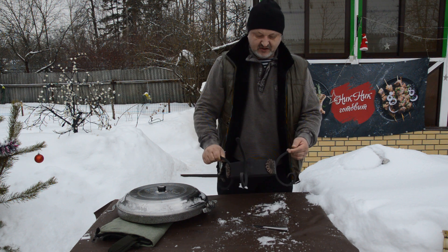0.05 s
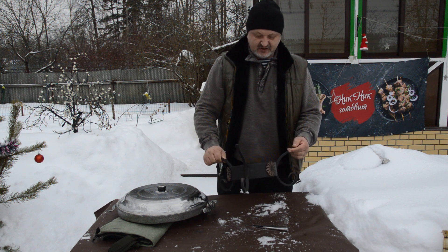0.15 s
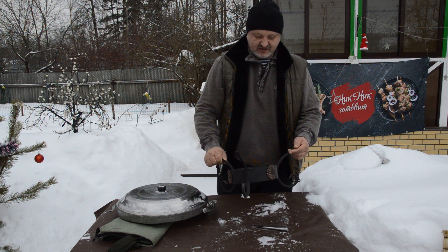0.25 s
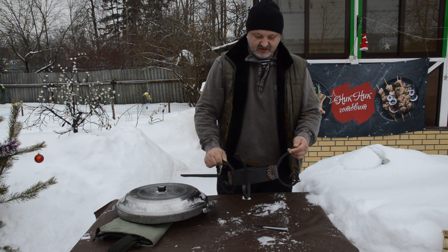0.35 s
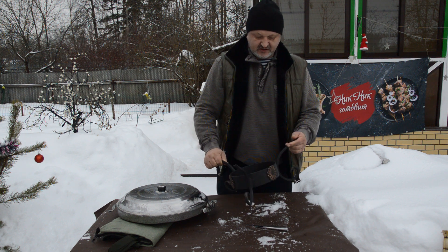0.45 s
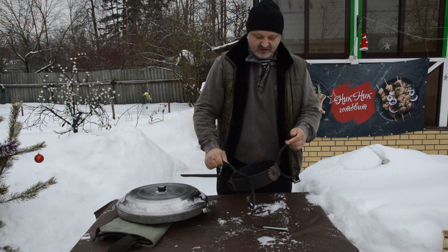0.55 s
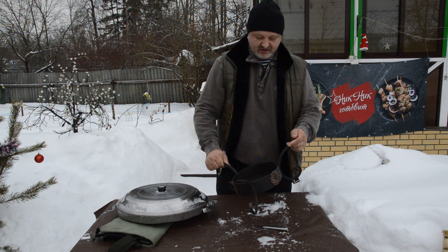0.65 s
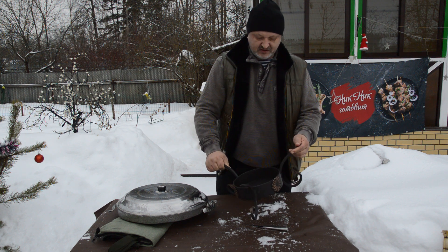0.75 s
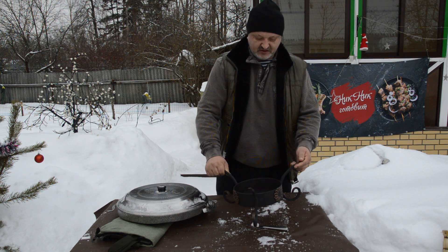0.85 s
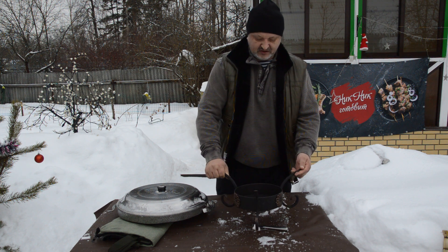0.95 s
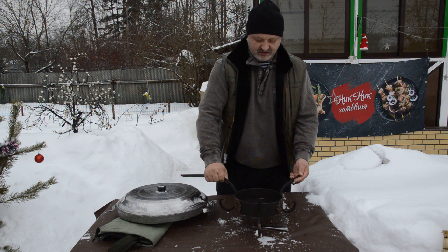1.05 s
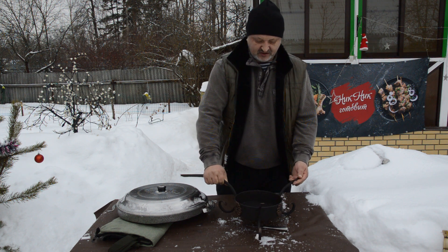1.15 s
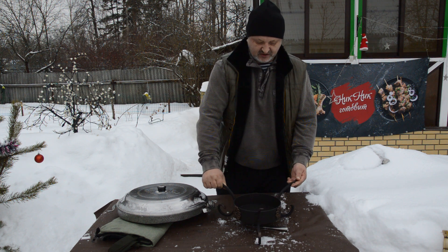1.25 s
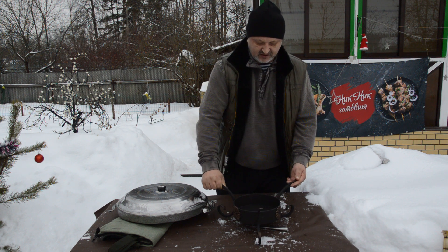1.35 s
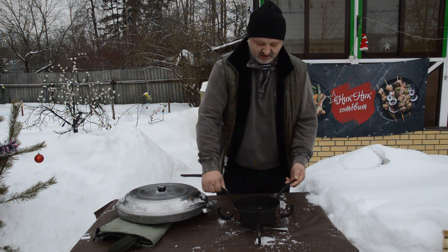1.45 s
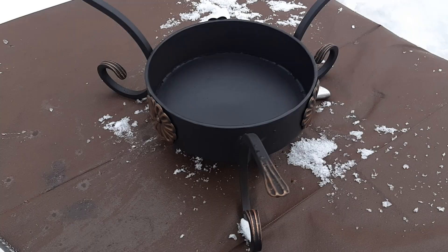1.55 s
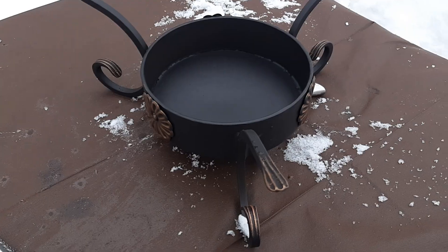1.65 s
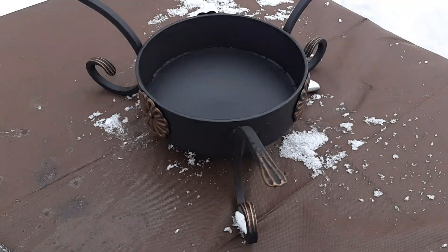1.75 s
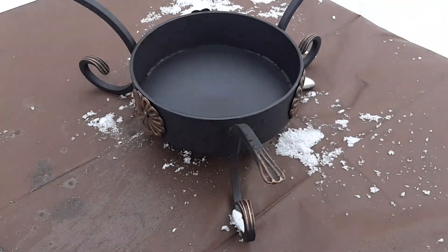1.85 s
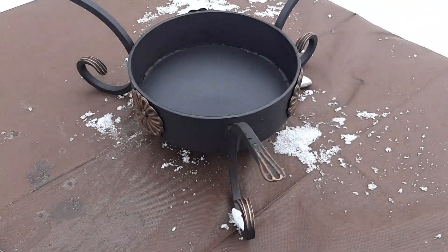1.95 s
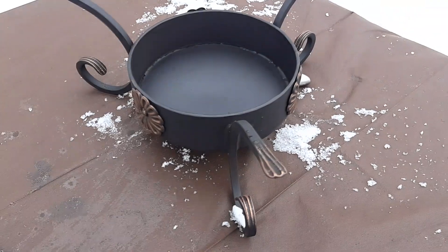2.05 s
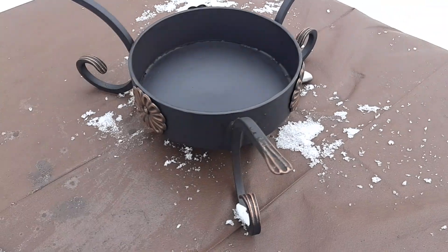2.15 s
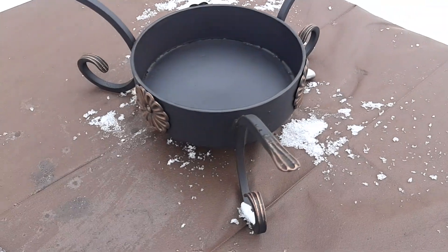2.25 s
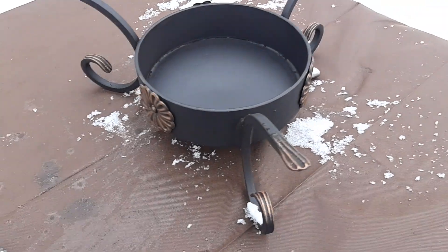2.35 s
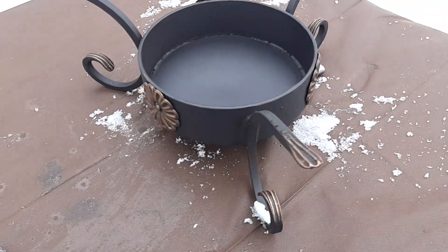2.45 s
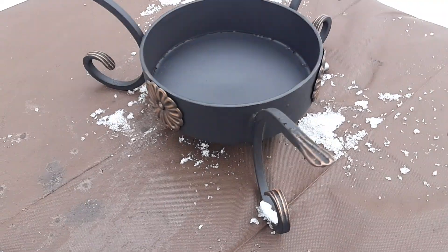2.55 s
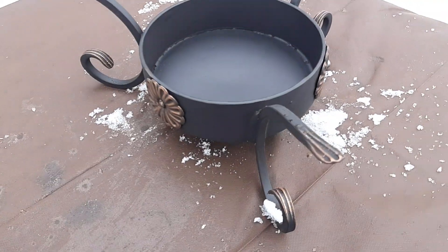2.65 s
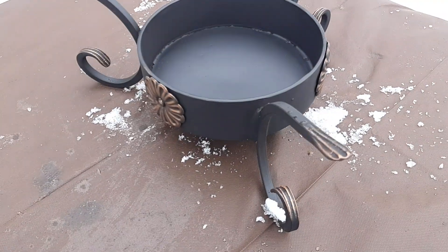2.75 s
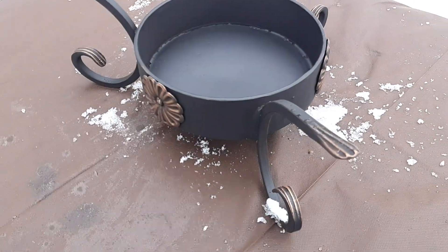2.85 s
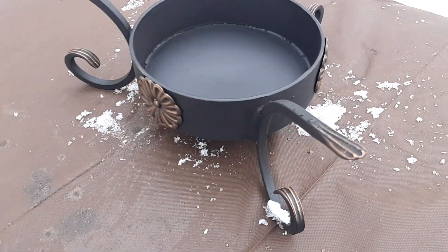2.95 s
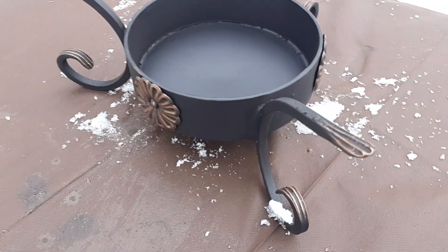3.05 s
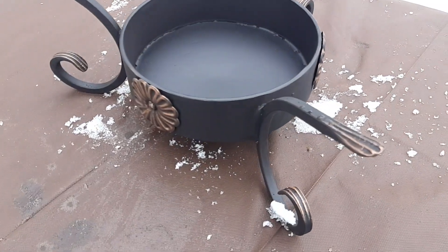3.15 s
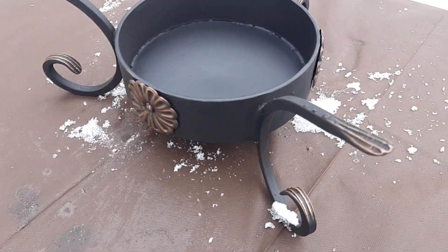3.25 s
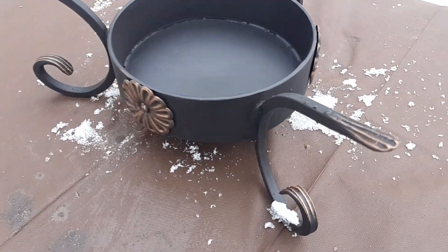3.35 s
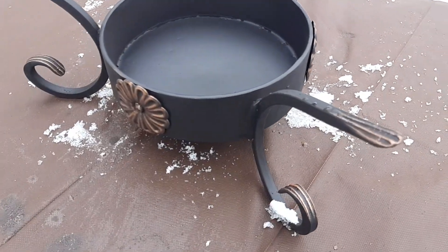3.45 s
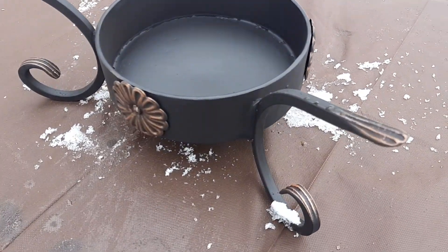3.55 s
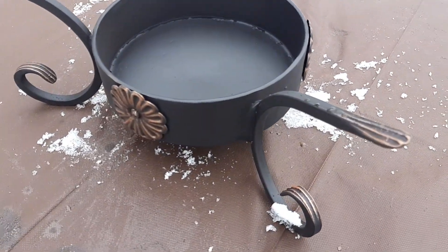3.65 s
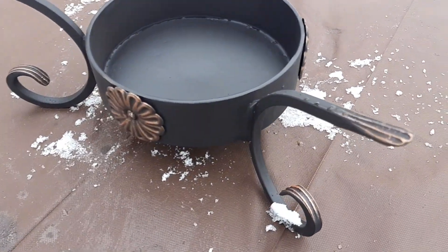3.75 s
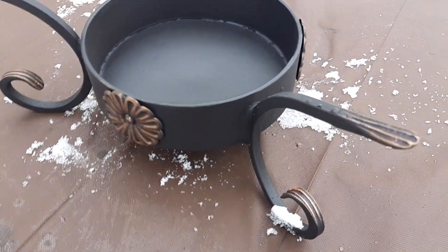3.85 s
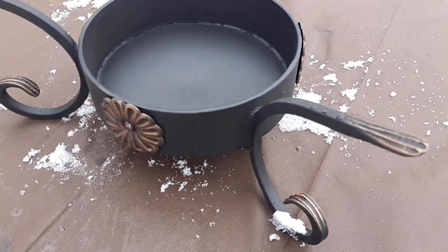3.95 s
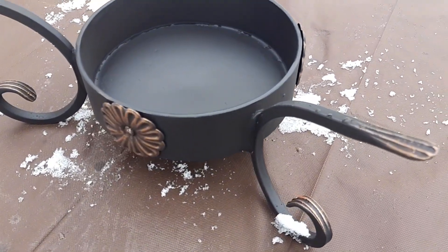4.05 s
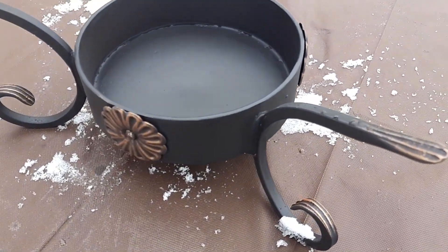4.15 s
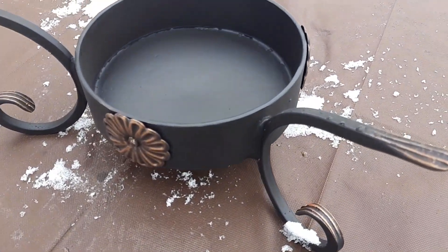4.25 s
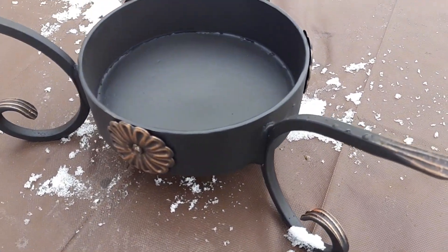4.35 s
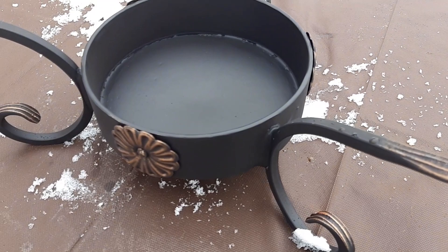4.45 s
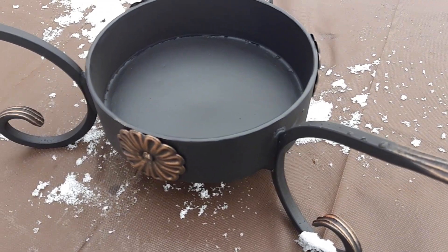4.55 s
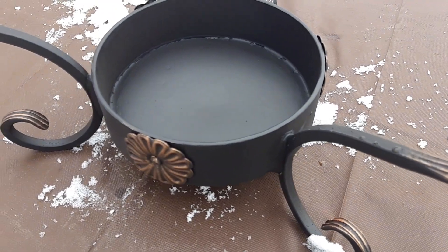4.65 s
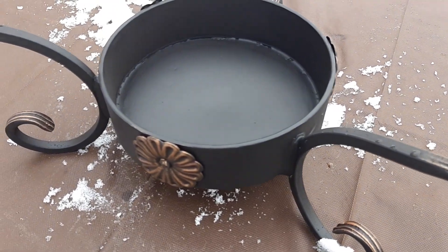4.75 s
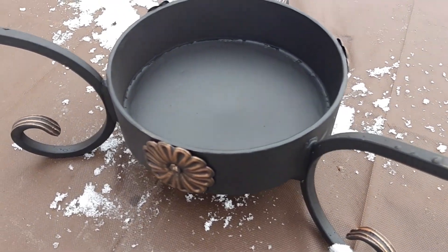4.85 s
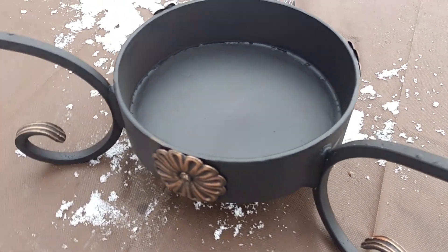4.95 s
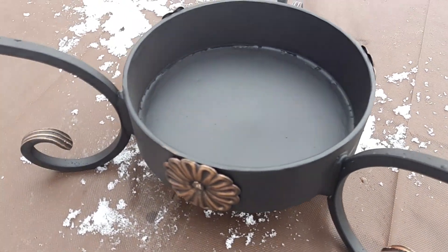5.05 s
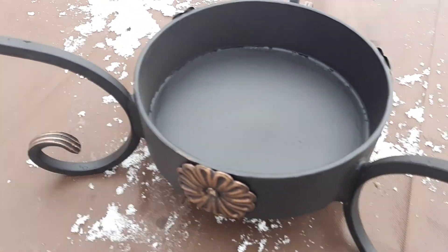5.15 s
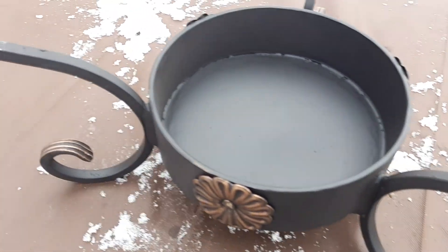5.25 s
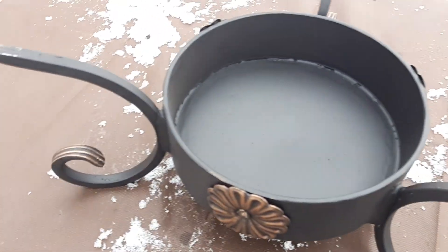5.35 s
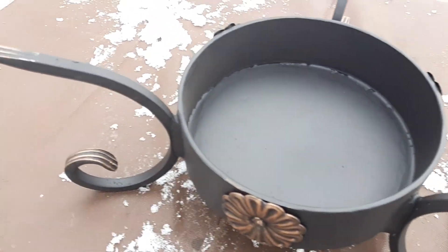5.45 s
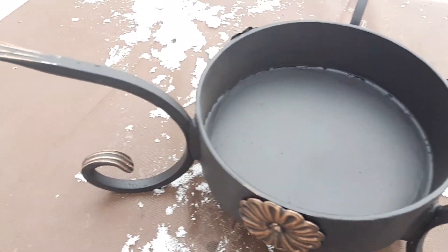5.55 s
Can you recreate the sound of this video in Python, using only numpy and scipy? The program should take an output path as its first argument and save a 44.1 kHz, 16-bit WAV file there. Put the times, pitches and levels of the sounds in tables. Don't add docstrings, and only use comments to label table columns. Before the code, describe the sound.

Two heavy metal-on-table thumps outdoors with distant traffic and faint chirps, cutting abruptly to hushed hiss with small plastic clicks and bumps.

```python
import sys
import numpy as np
from scipy import signal
from scipy.fft import rfft, irfft, next_fast_len
from scipy.io import wavfile
from scipy.ndimage import uniform_filter1d, map_coordinates

SR = 44100
rng = np.random.default_rng(int(sys.argv[2]) if len(sys.argv) > 2 else 0)


def master(y):
    cut = np.clip(np.atleast_2d(y).T, -1, 1)
    pcm = np.round(cut * 32767)
    wavfile.write(sys.argv[1], SR, pcm.astype(np.int16))


def volts_from_decibels(level):
    exponent = np.asarray(level, float) / 20
    return 10 ** exponent


N = 246959

# time in seconds, force in dB, side of the table as +1 or -1.
FIRST_LANDING = [(1.2888, -10, -1), (1.291, -2.5, 1), (1.2932, -15.5, 1), (1.2985, -19, -1),
                 (1.3035, -21, -1), (1.3095, -13.5, 1), (1.3165, -15.5, 1), (1.3225, -9, -1),
                 (1.3285, -18.5, 1), (1.3355, -12.5, -1), (1.342, -21, 1), (1.358, -18, 1), (1.369, -39, 1),
                 (1.398, -18, 1), (1.41, -34, 1), (1.428, -35.5, -1), (1.455, -38, 1), (1.47, -25.5, 1)]
SECOND_LANDING = [(1.4933, -2, -1), (1.4948, -10, 1), (1.4962, -18, 1), (1.505, -26, 1), (1.511, -13, 1),
                  (1.521, -17.5, 1), (1.532, -24, -1), (1.5525, -13.5, 1), (1.57, -19.5, 1), (1.59, -27, 1)]
# frequency in Hz, width in Hz, level in dB.
TILTED_MODES = [(75.1, 6.2, -4.5), (124.4, 24.5, 0.5), (58.7, 16.5, -22.5), (153, 53, -12.5),
                (224, 41, -18.5), (302, 120, -14.5), (440.4, 21, -15.5), (550, 23, -13), (581, 16, -5),
                (617, 150, -5), (1094, 240, -7), (1470, 300, 4.5)]
LOADED_MODES = [(87, 11, -13.5), (135.6, 24.3, -3), (255.4, 13, -11), (165, 11, -8), (485, 10, -20.5),
                (553, 55, -16), (635, 40, -7), (767, 24, -13.5), (940, 240, -24.5), (1340, 370, -11.5)]
# time in seconds, level in dB, t60 in seconds, dull above in Hz.
CRACKS = [
    (1.287, -27, 0.015, 3960),
    (1.29, -28, 0.023, 6990),
    (1.318, -30, 0.027, 1100),
    (1.4937, -14, 0.008, 1200),
    (1.4962, -25.5, 0.0057, 1970),
]
# frequency in Hz, level in dB per Hz.
CRACK_COLOUR = [(300, -54.5), (900, 3), (1500, -7), (2900, 1), (4500, -11), (7400, -12.5), (12000, -38),
                (16000, -33.5)]
# time in seconds, peak in dB, dull above in Hz.
FOOT_PUSHES = [
    (1.4964, -14.5, 1000),
    (1.7, -17.5, 900),
    (1.5, -20.5, 800),
]
# time in seconds, level in dB, t60 at 1000 Hz in seconds.
SHUDDERS = [
    (1.29, -22.5, 0.18),
    (1.496, -33, 0.54),
]
# frequency in Hz, level in dB per Hz.
FRAME_COLOUR = [(35, -31), (60, -4), (150, 5), (300, -3.5), (600, -10.5), (1200, -16), (2500, -35.5)]
# time in seconds, frequency in Hz, level in dB.
PANEL_HUM = [(1.296, 228, -19), (1.34, 230, -23.5), (1.36, 228, -23), (1.38, 230, -22), (1.396, 225, -41),
             (1.444, 214, -31), (1.472, 211, -49), (1.485, 206.2, -17.5)]
# time in seconds, frequency in Hz, level in dB.
FOOT_SQUEAK = [(1.288, 7400, -62.5), (1.296, 7370, -53), (1.3, 7385, -74), (1.312, 7385, -66),
               (1.322, 7380, -50.5), (1.336, 7360, -59), (1.349, 7400, -60), (1.356, 7380, -68),
               (1.39, 7395, -66)]

# time in seconds, main resonances in dB rms,
# then body, upper and bright resonances in dB over the main ones.
TICKS = [(1.932, -47.5, -3, -10, -6.5), (2.0376, -61, -12, -4.5, -5), (2.345, -64, -2.5, 10, 10),
         (2.4423, -52.5, 0, -4, -8), (2.8518, -66, -2, 9, 6), (3.077, -33, -6.5, 6.5, 2.5),
         (3.125, -61, 4, 3, -8), (3.157, -63, -3, -4, -5), (3.2358, -49.5, 2.5, -1, -3),
         (3.271, -34.5, 2.5, 10, 6), (3.35, -67, -6, 9, 5), (3.3934, -39, -4, 2.5, -3),
         (3.555, -53, -10, -2, -19), (3.5787, -44.5, -6.5, 3, -4.5), (3.7745, -54, -10, -6, -20),
         (4.064, -42.5, 6, -3, 5), (4.2483, -27.5, -3.5, -8.5, -2.5), (4.2628, -41.5, -1, -6, -9),
         (4.5895, -49, -6, -14, -2), (4.62, -63, 5, 0.5, 0), (5.145, -46.5, -22, -27, -18)]
SCRAPES = [
    (2.5795, -32, -5, -11, -11.5),
    (2.6205, -45, -6, -10, -11),
    (2.6383, -36, -3.5, -1, -6),
    (2.8812, -42.5, -5.5, 1, 4),
    (4.2205, -44, -3.5, -2, -2),
    (5.1205, -54, -17, -5, -20),
]
# modes (frequency in Hz, width in Hz, level in dB), rattle t60 in seconds.
SHELL_GROUPS = [
    ([(950, 650, 0)], 0.025),
    ([(1430, 1340, 2), (2300, 1960, 3.5)], 0.03),
    ([(3200, 856, 13), (5040, 1210, 12.5)], 0.023),
    ([(5810, 1800, 0)], 0.015),
    ([(10240, 2700, 0)], 0.013),
    ([(15300, 2500, 0)], .01),
]
SHELL_SHADE_DB = [-1, -3, -6, -10, -7, -10]
# time in seconds, level in dB rms, frequency in Hz, left minus right in dB.
PINGS = [(1.93, -54, 15300, -10), (3.0775, -47, 4620, -5), (3.2352, -52, 15300, -10),
         (3.2715, -46, 11100, -7), (3.3935, -40.5, 4770, 0), (4.0642, -37.5, 2470, -6),
         (4.0668, -40, 2000, -5), (4.0647, -50, 6340, -8), (4.221, -40, 15300, -14),
         (4.2484, -41.5, 4100, -2), (4.2485, -41, 2090, -7), (3.0978, -50.5, 15200, 6),
         (2.582, -40, 4750, -3), (2.582, -44, 1920, -6), (2.6405, -41, 4800, -6), (2.883, -41, 4730, -8),
         (3.2714, -42.5, 1490, 0), (3.272, -46, 1000, -3), (5.4853, -49, 3320, -3), (5.494, -49, 1700, -8)]
# time in seconds, peak in dB, frequency in Hz, left minus right in dB.
FINGERTIP_TAPS = [(3.257, -35, 640, -5.5), (4.038, -40.5, 810, -11), (4.487, -49, 653, -8),
                  (4.5895, -34, 840, -4), (4.6185, -43.5, 550, -5), (4.674, -53, 494, 2),
                  (4.829, -54, 500, -8), (4.978, -45, 600, -6), (5.066, -45.5, 617, -12),
                  (5.086, -54, 600, -8), (5.113, -52, 750, -11), (5.1681, -44, 600, -14),
                  (5.527, -45, 700, -10)]
NAIL_TAPS = [
    (2.779, -18, 1780, 0.5),
    (5.484, -33, 1420, -11.5),
]
# time in seconds, peak in dB, frequency in Hz.
GRIP_BUMPS = [(1.879, -49, 135), (1.965, -67, 145), (2.342, -47.5, 124), (2.619, -46, 234),
              (2.693, -49.5, 226), (2.775, -52, 320), (3.87, -50, 216), (3.92, -57, 192), (4.034, -54, 244),
              (4.287, -55, 228), (4.669, -53, 121), (4.825, -53.5, 121), (4.971, -56, 286),
              (5.079, -53.5, 165), (5.343, -57.5, 209), (5.521, -54.5, 149)]
# time in seconds, peak in dB.
JOLTS = [(2.578, -39), (2.637, -36), (2.879, -47), (3.081, -41.5), (3.272, -36), (3.296, -49), (3.317, -56),
         (3.381, -54), (3.397, -46), (4.064, -45.5), (4.247, -41), (4.262, -43), (4.616, -50.5)]
# time in seconds, length in seconds, level in dB.
RUBS = [
    (2.346, 0.15, -57.5),
    (3.094, 0.023, -49.5),
    (3.287, 0.027, -47),
    (4.09, .025, -61),
    (4.264, 0.035, -56.5),
    (4.917, 0.25, -77),
]
# frequency in Hz, level in dB per Hz.
STRAP_COLOUR = [(1760, -30), (3000, 0), (3170, -19), (4190, -2), (5090, -3), (6100, -1.5), (8220, -11),
                (11200, -4), (12700, -10), (14200, -9), (15800, -11)]
# start in seconds, its pitch in Hz, end in seconds, its pitch in Hz.
FOCUS_GLIDES = [
    (1.705, 16000, 1.725, 8000),
    (1.745, 16000, 1.77, 7500),
    (1.775, 9000, 1.797, 16000),
    (1.825, 7500, 1.853, 16000),
]

# time in seconds, frequency in Hz, level in dB.
NEAR_BIRD = [(1.185, 4765, -68), (1.197, 4700, -50), (1.235, 4499, -41), (1.245, 4503, -48),
             (1.262, 4547, -69)]
# time in seconds, frequency in Hz, level in dB.
FAR_CALLS = [
    [(0.96, 3340, -64), (0.98, 3378, -53), (1.014, 3290, -50), (1.104, 3190, -56), (1.13, 3280, -62)],
    [(1.45, 3380, -69), (1.478, 3200, -48.5), (1.516, 3300, -63.5), (1.56, 3260, -53.5)],
    [(0.39, 4760, -66), (0.398, 4720, -59), (0.414, 4630, -58), (0.425, 4600, -66)],
]
# time in seconds, depth in dB, recovery in seconds.
DUCKS = [
    (1.295, -8.5, 0.069),
    (1.496, -18.5, 0.049),
]
# time in seconds, level in dB.
HAND_MOTION = [(1.64, -61.5), (2.02, -65.5), (2.27, -65), (2.45, -62.5), (3.34, -59.5), (3.63, -63),
               (4.1, -61.5), (4.34, -62.5), (4.81, -61.5), (5.0, -61), (5.2, -64), (5.6, -64)]
GRIP_PRESSURE = [(1.64, -63.5), (1.88, -60), (2.0, -65), (2.3, -65.5), (2.73, -64), (3.1, -64), (3.4, -65),
                 (3.711, -66.5), (4.0, -59), (4.12, -63), (4.311, -64.5), (4.97, -66), (5.09, -64.5),
                 (5.6, -69)]
# frequency in Hz, level in dB per Hz.
ROAD_COLOUR = [(13, -36), (22, -5), (43, 4), (82, -5.5), (114, -2), (241, -4), (359, -9.5), (876, -4),
               (1470, -5.5), (1850, -8), (2010, -11.5), (2290, -14.5), (3340, -15), (4320, -24.5),
               (6000, -34), (7800, -57.5), (13200, -120)]
FIRST_HISS_COLOUR = [(2350, -9), (4000, -8.5), (4340, -10), (5810, -9), (15100, -11), (15800, -11)]
RUMBLE_COLOUR = [(15, -38.5), (32, -11.5), (50, -3), (118, -1.5), (172, -2.5), (297, -5.5), (334, -17),
                 (600, -6), (780, -45.5), (1320, -120)]
YARD_COLOUR = [(180, -54), (300, -12), (377, -10), (512, -13), (717, -6), (800, -4.5), (1130, -5.5),
               (1310, -4.5), (1860, -3.5), (3200, -15.5), (4160, -40), (7040, -120)]
CLOTHES_COLOUR = [(1760, -34), (3000, -5.5), (3200, 0.5), (4040, 1.5), (4460, -1), (5750, -7), (7400, -20),
                  (9620, -61), (16300, -120)]
SECOND_HISS_COLOUR = [(4240, -41.5), (7000, -30), (7710, -12), (9550, -4), (10200, -1.5), (11400, -1),
                      (13200, -4.5), (15100, -3.5), (15800, -5)]
# frequency in Hz, left-right likeness from -1 to 1.
FIRST_LIKENESS = [(60, 0.9985), (290, 0.9988), (640, 0.9994), (900, 1.0), (2700, 1.0), (3600, 0.97),
                  (6820, 0.78), (15000, 0.7)]
SECOND_LIKENESS = [(60, 0.6), (130, 0.57), (290, 0.5), (640, 0.04), (1410, -0.16), (3100, 0.09),
                   (6820, -0.43), (15000, 0.03)]
# frequency in Hz, left minus right in dB.
AIR_BALANCE = [(60, -4), (110, 0.5), (200, -7), (380, -4), (700, 0.5), (1290, -3), (2380, -1.5),
               (4400, 0.5), (8120, -3.5), (15000, 0.5)]
# frequency in Hz, level in dB.
WHINE = [(15626, -75.5)]

FIRST_ENDS_S, SECOND_STARTS_S = 1.6005, 1.634
FLOOR_TOP_HZ, TOP_HZ = 15850, 16780
TOUCH_MS, ROCK_MS, SETTLE_S = 1.6, 2.9, 0.011
LOW_DB, TOP_DB, RATTLE_DB = -15.5, -4.5, -24.5
SCRAPE_S, SCRAPE_DB = 0.0018, 22
REBOUND_S, REBOUND_DB = 0.0033, -19
PING_WIDTH_HZ, PING_WIDENS = 340, 0.07
JOLT_HZ = 225
RUB_FADE_S, RUB_SAG_DB = 0.003, -1.5
CATCH_DB, RUB_RELEASE = 9.5, 0.4
ROAD_DB, NEARING_DB_PER_S, FIRST_HISS_DB = -37.5, 0.8, -50
RUMBLE_DB, YARD_DB, CLOTHES_DB, SECOND_HISS_DB = 2.5, -54, -60, -64.5
YARD_FOLLOWS = 0.33
CLOTHES_FOLLOW, HISS_FOLLOWS = 0.64, 1.15
SMOOTH_DB = 0.9


def unit(x):
    return x / np.sqrt(np.mean(x ** 2) + 1e-20)


def along(points, hz):
    f, v = np.transpose(points)
    return np.interp(np.log(hz + 1), np.log(f + 1), v)


def curves(rows):
    s, *cols = np.transpose(rows)
    return [np.interp(np.arange(N) / SR, s, c) for c in cols]


def gate(start, end, fade):
    t = np.arange(N) / SR
    return np.clip(np.minimum(t - start, end - t) / fade, 0, 1)


def wobble(rate):
    knots = rng.standard_normal(int(N * rate / SR) + 4)
    return map_coordinates(knots, [np.arange(N) * rate / SR])


def resonances(modes, hz):
    total = 0
    for k, (centre, width, db) in enumerate(modes):
        damping = 1j * hz * width
        total = total + (-1) ** k * volts_from_decibels(db) * damping / (centre * centre - hz * hz + damping + 1e-9)
    return total


def filtered(x, response):
    m = next_fast_len(x.shape[-1] + 8192)
    return irfft(rfft(x, m) * response(np.fft.rfftfreq(m, 1 / SR)), m)[..., :x.shape[-1]]


def rush(spectrum, alike, patchy_db):
    z = signal.stft(rng.standard_normal((2, N)), nperseg=512)[2]
    field = uniform_filter1d(rng.standard_normal(z.shape[1:]), 6, 0)
    field = uniform_filter1d(field, 14, 1)
    pair = signal.istft(z * volts_from_decibels(patchy_db * unit(field)), nperseg=512)[1][:, :N]

    def mid_side(hz):
        turn = np.arccos(np.clip(along(alike, hz), -1, 1)) / 2
        return volts_from_decibels(along(spectrum, hz)) * [np.cos(turn), np.sin(turn)]

    mid, side = filtered(pair, mid_side)
    return unit(np.array([mid + side, mid - side]))


def whistle(rows, rough_db):
    hz, db = curves(rows)
    tone = np.sqrt(2) * np.sin(2 * np.pi * np.cumsum(hz) / SR)
    return volts_from_decibels(db + rough_db * wobble(120)) * tone * gate(rows[0][0], rows[-1][0], 0.0076)


def add(out, s, db, pan_db, pair, lag_s):
    at, lag = round(s * SR), round(lag_s * SR)
    out[0, at + lag:][:pair.shape[1]] += volts_from_decibels(db + pan_db / 2) * pair[0]
    out[1, at:][:pair.shape[1]] += volts_from_decibels(db - pan_db / 2) * pair[1]


def landing(contacts, modes, gain_db):
    t, force = np.arange(N) / SR, np.zeros(N)
    for s, db, side in contacts:
        ms = ROCK_MS + (TOUCH_MS - ROCK_MS) * np.exp(-abs(s - contacts[0][0]) / SETTLE_S)
        phase = np.clip((t - s) / (ms / 1000), 0, 1)
        force += np.sign(side) * volts_from_decibels(db) * np.sin(np.pi * phase) ** 2 / ms
    return volts_from_decibels(gain_db) * filtered(force, lambda hz: resonances(modes, hz))


def cracks():
    out, t = np.zeros(N), np.arange(1024) / SR
    for s, db, t60, dull_hz in CRACKS:
        colour = lambda hz: volts_from_decibels(along(CRACK_COLOUR, hz)) / (1 + (hz / dull_hz) ** 2)
        noise = unit(filtered(rng.standard_normal(len(t)), colour))
        onset = np.clip(t / 0.0006, 0, 1) ** 2
        out[round(s * SR):][:len(t)] += volts_from_decibels(db - 60 * t / t60) * onset * noise
    for s, db, dull_hz in FOOT_PUSHES:
        u = 2 * np.pi * dull_hz * t
        out[round(s * SR):][:len(t)] -= volts_from_decibels(db) * u * (1 - u / 3) * np.exp(1 - u)
    return out


def shudder():
    out = np.zeros(N + SR)
    for s, db, t60 in SHUDDERS:
        hz, t, z = signal.stft(rng.standard_normal(SR // 2), SR, nperseg=256)
        fade = volts_from_decibels(-60 * t * (1 + hz[:, None] / 500) / (3.0 * t60))
        tail = signal.istft(z * fade, SR, nperseg=256)[1]
        tail = filtered(tail, lambda f: volts_from_decibels(along(FRAME_COLOUR, f)))
        tail *= np.clip(np.arange(len(tail)) / SR / 0.003, 0, 1) ** 2
        out[round(s * SR):][:len(tail)] += volts_from_decibels(db) * tail / np.sqrt(np.mean(tail[:1024] ** 2))
    return out[:N]


def stand():
    thuds = landing(FIRST_LANDING, TILTED_MODES, gain_db=17.0)
    thuds += landing(SECOND_LANDING, LOADED_MODES, gain_db=23.5)
    squeak = whistle(FOOT_SQUEAK, rough_db=1.0) * (1 + 0.41 * wobble(450))
    return thuds + cracks() + shudder() + whistle(PANEL_HUM, rough_db=2.5) + squeak


def strike(out, s, groups, left_db, slips):
    t = np.arange(1024) / SR
    noise = rng.standard_normal((2, len(t)))
    shared = noise + 2 * slips * noise[1]
    port_db = np.array([[5 - 5 * slips], [-1]])
    impulses = (t == 0) + volts_from_decibels(REBOUND_DB) * (t == t[round(REBOUND_S * SR)])
    for (modes, t60), shade_db, db in groups:
        decay_db = -60 * np.clip(t - slips * SCRAPE_S, 0, 1) / (t60 / (1 + slips))
        snap = impulses + volts_from_decibels(RATTLE_DB + slips * SCRAPE_DB + decay_db + port_db) * shared
        ring = filtered(snap, lambda hz: resonances(modes, hz) ** 2)
        ring /= np.sqrt(np.sum(ring ** 2, 1, keepdims=True) / (SR / 100))
        add(out, s + 0.0006, db + shade_db / 2, shade_db + left_db, ring, lag_s=0.00048)


def ticks():
    out = np.zeros((2, N + SR))
    for table, slips in ((TICKS, 0), (SCRAPES, 1)):
        for s, db, body, upper, bright in table:
            levels = db + np.array([body + LOW_DB, body, 0, upper, bright, bright + TOP_DB])
            strike(out, s, zip(SHELL_GROUPS, SHELL_SHADE_DB, levels), 0, slips)
    for s, length, db in RUBS[1:3]:
        levels = db + CATCH_DB + np.array([-16.0, -14, -7, -8, -5, -6])
        strike(out, s, zip(SHELL_GROUPS, SHELL_SHADE_DB, levels), 8, 0)
    for s, db, hz, pan_db in PINGS:
        modes = [(hz, PING_WIDTH_HZ + PING_WIDENS * hz, 0)]
        strike(out, s, [((modes, 0.014), pan_db, db)], 0, 0)
    return out[:, :N]


def knocks():
    out, t = np.zeros((2, N + SR)), np.arange(1024) / SR

    def soft(f):
        return 1 / (1 + 1.4j * f / 3600 - (f / 3600) ** 2) ** 3 * 1j * f / (230 + 1j * f)

    for table, spread, echo_db in ((FINGERTIP_TAPS, 0.59, -0.5), (NAIL_TAPS, 2.34, -8)):
        for s, db, hz, pan_db in table:
            push = 5 * (t == 0) + volts_from_decibels(echo_db - 60 * t / 0.017) * rng.standard_normal((2, len(t)))
            ring = filtered(push, lambda f: resonances([(hz, hz * spread, 0)], f) * soft(f))
            add(out, s + 0.0009, db + 3, pan_db, ring / np.abs(ring).max(), lag_s=0.0001)
    return out[:, :N]


def bumps():
    out, t = np.zeros((2, N + SR)), np.arange(4096) / SR
    rows = [(s, db, hz, -9) for s, db, hz in GRIP_BUMPS]
    rows += [(s, db - 2.5, JOLT_HZ, -5) for s, db in JOLTS]
    for s, db, hz, pan_db in rows:
        envelope = volts_from_decibels(-60 * t / 0.032) * (1 - np.exp(-t / 0.0037)) ** 2
        note = envelope * np.sin(2 * np.pi * hz * t)
        add(out, s + 0.00075, db, pan_db, np.array([note, note]) / np.abs(note).max(), lag_s=0)
    return out[:, :N]


def rubs():
    t, stroke = np.arange(N) / SR, np.zeros(N)
    for s, length, db in RUBS:
        sag_db = RUB_SAG_DB * np.clip((t - s) / length, 0, 1)
        fades = gate(s, 9, RUB_FADE_S) * gate(-1, s + length, RUB_RELEASE * length)
        stroke += volts_from_decibels(db + sag_db) * fades
    grain = volts_from_decibels(1.2 * wobble(560) + 1.1 * wobble(60))
    return volts_from_decibels(3.0) * stroke * unit(grain * rush(STRAP_COLOUR, [(3000, 0.16)], patchy_db=SMOOTH_DB))


def lens():
    return sum(whistle([(a, hz_a, -71), (b, hz_b, -71)], rough_db=2) for a, hz_a, b, hz_b in FOCUS_GLIDES)


def birds():
    return whistle(NEAR_BIRD, rough_db=3.0) + sum(whistle(call, rough_db=2.0) for call in FAR_CALLS)


def ducking():
    t = np.arange(N) / SR
    return volts_from_decibels(sum(db * np.exp(-np.clip(t - s, 0, 9) / back) * gate(s, 9, 0.0036) for s, db, back in DUCKS))


def road_and_hiss():
    t = np.arange(N) / SR
    road_db = ROAD_DB + NEARING_DB_PER_S * t + 0.26 * wobble(6.1)
    road = volts_from_decibels(road_db) * rush(ROAD_COLOUR, FIRST_LIKENESS, patchy_db=-1.12)
    hiss = volts_from_decibels(FIRST_HISS_DB) * rush(FIRST_HISS_COLOUR, FIRST_LIKENESS, patchy_db=-0.6)
    whine = sum(volts_from_decibels(db + 3) * np.sin(2 * np.pi * hz * t) for hz, db in WHINE)
    return road + hiss + whine


def air():
    (motion_db,), (grip_db,) = curves(HAND_MOTION), curves(GRIP_PRESSURE)
    motion_db = motion_db - np.mean([db for s, db in HAND_MOTION])
    press_db = grip_db - np.mean([db for s, db in GRIP_PRESSURE])
    rumble_db = RUMBLE_DB + grip_db + 0.97 * wobble(7.8)
    yard_db = YARD_DB + YARD_FOLLOWS * press_db + 0.51 * wobble(7.5)
    clothes_db = CLOTHES_DB + CLOTHES_FOLLOW * motion_db + SMOOTH_DB * wobble(14.0)
    hiss_db = SECOND_HISS_DB + HISS_FOLLOWS * motion_db
    total = volts_from_decibels(rumble_db) * rush(RUMBLE_COLOUR, SECOND_LIKENESS, patchy_db=1.7)
    for db, colour in ((yard_db, YARD_COLOUR), (clothes_db, CLOTHES_COLOUR), (hiss_db, SECOND_HISS_COLOUR)):
        total += volts_from_decibels(db) * rush(colour, SECOND_LIKENESS, patchy_db=SMOOTH_DB)
    return filtered(total, lambda hz: volts_from_decibels(np.outer([0.5, -0.5], along(AIR_BALANCE, hz))))


def scene():
    band = lambda hz: hz < FLOOR_TOP_HZ
    first = filtered(stand() + birds() + road_and_hiss() * ducking(), band)
    second = filtered(air() + rubs() + lens(), band) + ticks() + knocks() + bumps()
    trace = volts_from_decibels(-51) * gate(FIRST_ENDS_S, FIRST_ENDS_S + 0.039, 0.0018)
    first_gain = gate(-1, FIRST_ENDS_S, 0.00056) + trace
    second_gain = gate(SECOND_STARTS_S, 9, 0.00062) + volts_from_decibels(-48.5)
    return first * first_gain + second * second_gain


def band_limit(x):
    return signal.sosfilt(signal.butter(12, 16680, fs=SR, output="sos"), x)


def record(dry):
    held = dry / (1 + np.abs(dry / 0.78) ** 6) ** (1 / 6)
    edge = lambda hz: np.clip((TOP_HZ - hz) / 1100, 0, 1) ** 2
    mix = filtered(held, edge)
    return band_limit(mix)


dry = scene()
out = record(dry)
master(out)
```